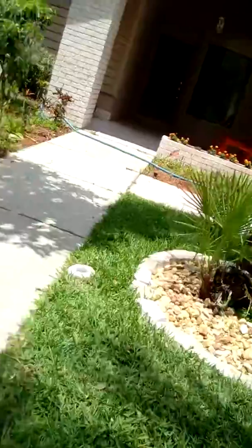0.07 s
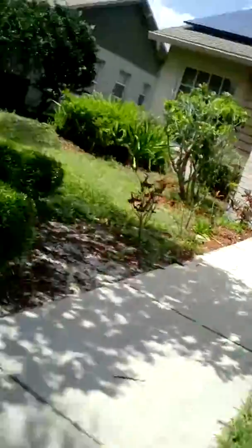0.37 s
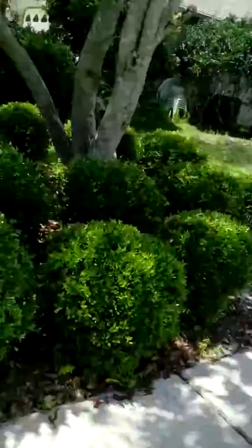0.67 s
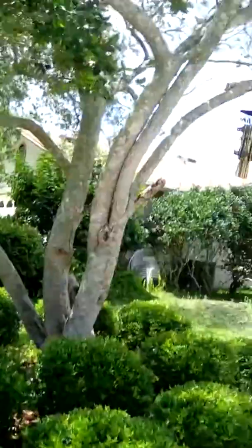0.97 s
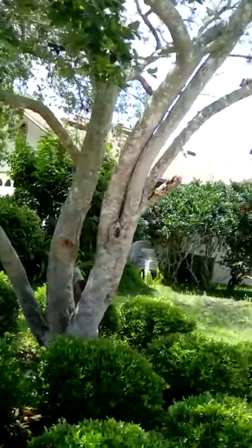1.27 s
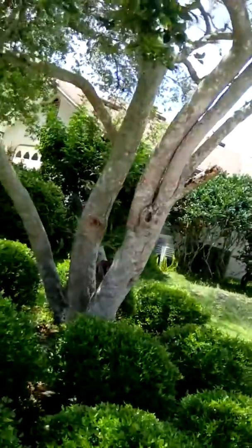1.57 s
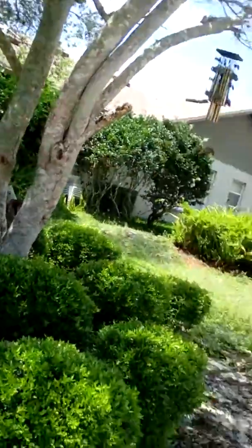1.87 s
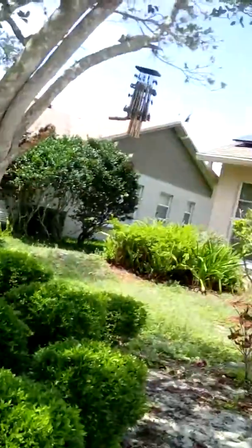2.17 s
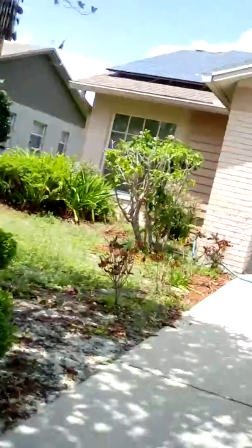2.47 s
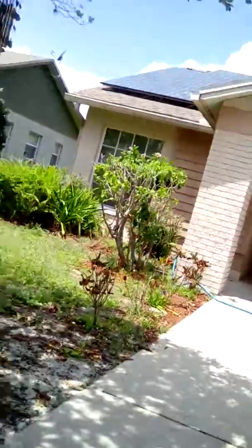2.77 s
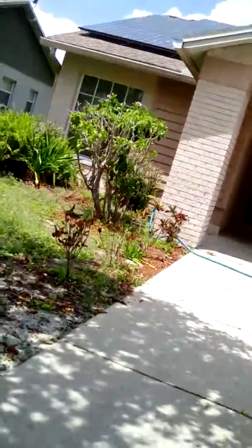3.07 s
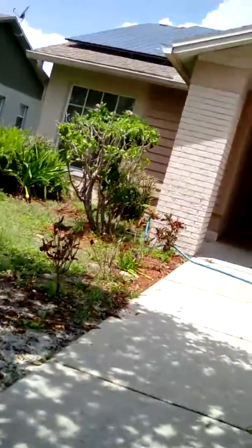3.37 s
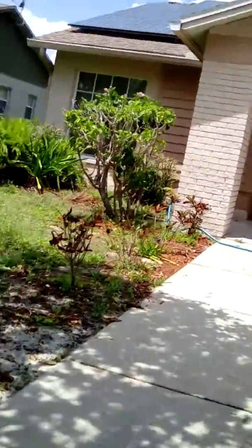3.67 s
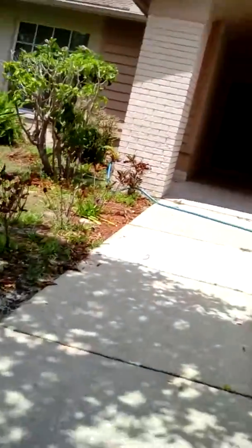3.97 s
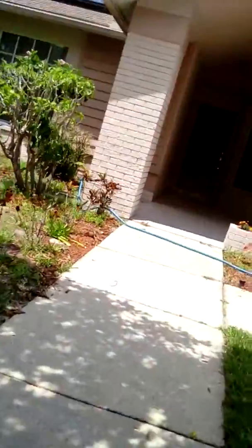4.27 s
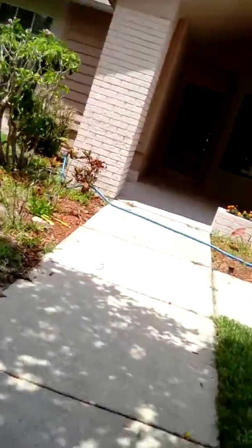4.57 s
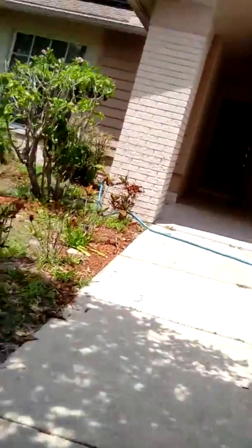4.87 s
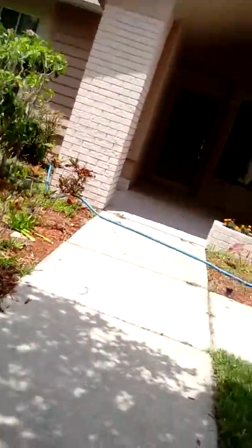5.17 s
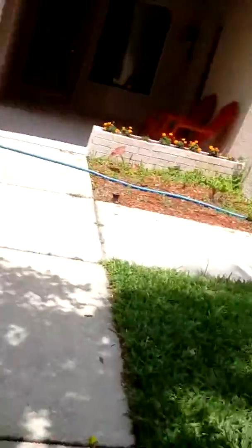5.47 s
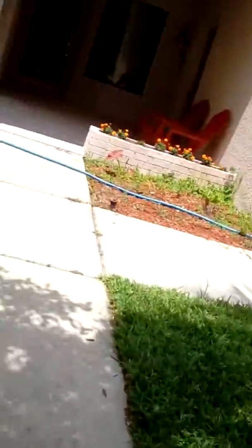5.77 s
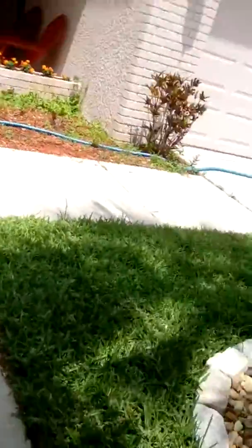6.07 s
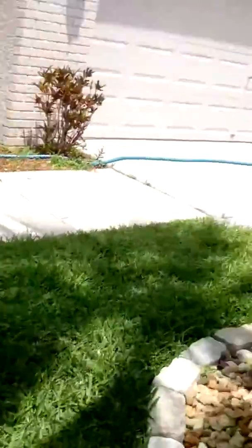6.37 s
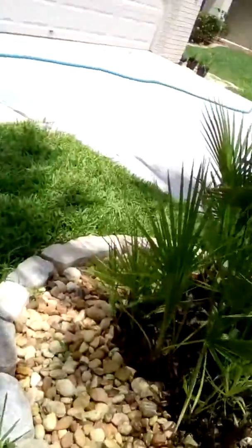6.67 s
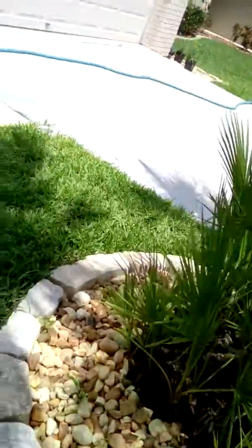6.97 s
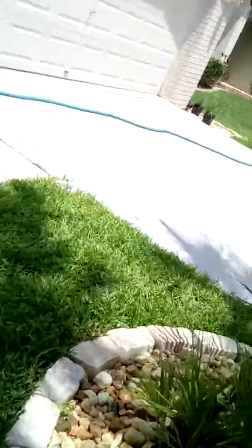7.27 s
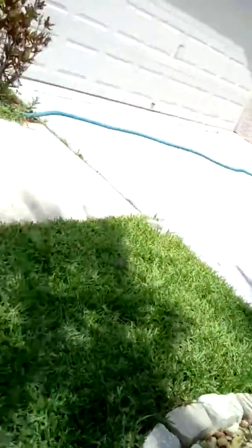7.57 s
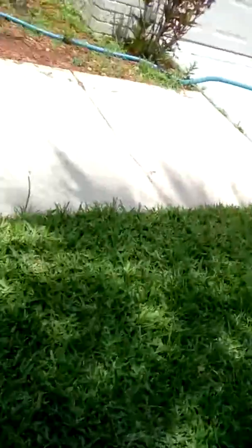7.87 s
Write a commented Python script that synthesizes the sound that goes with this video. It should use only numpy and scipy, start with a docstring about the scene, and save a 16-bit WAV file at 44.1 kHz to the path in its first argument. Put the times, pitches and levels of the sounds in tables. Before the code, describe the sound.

Keys jingle close by as someone strolls outdoors, with a few gritty footsteps on concrete and light puffs of wind.

```python
"""Loose metal pieces, keys perhaps, jingle close to the microphone as someone strolls a garden path.
They ring where they strike, tick where they only touch and rustle as they slide. On the concrete below,
a few shoe knocks and gritty scuffs stand out. Puffs of breeze and one dull bump buffet the microphone,
and far off a motor hums under the quiet outdoor air."""
import sys
import numpy as np
from scipy import signal
from scipy.fft import rfft, irfft
from scipy.io import wavfile
from scipy.ndimage import uniform_filter1d

SR = 44100
rng = np.random.default_rng(int(sys.argv[2]) if len(sys.argv) > 2 else 0)


def master(y):
    """Save y as 16-bit WAV."""
    cut = np.clip(np.atleast_2d(y).T, -1, 1)
    pcm = np.round(cut * 32767)  # scale
    wavfile.write(sys.argv[1], SR, pcm.astype(np.int16))


N = 357783
TIME = np.arange(N) / SR

# modes of the metal pieces, by register: (frequency [Hz], relative level [dB], t60 [s])
METAL_MODES = { "low": [(1491, -5, .25), (1500, 0, .3)], "middle": [(3960, -7, .2), (3983, 0, .28),
               (4001, -6, .22), (4232, -22, .1), (4414, -22, .08), (4630, -28, .1)],
               "bright": [(7040, -19, .06), (7370, -4, .06), (7420, 0, .08), (7478, -1, .09)],
               "shimmer": [(8120, -4, .035), (8215, -2, .04), (8300, 0, .05), (8430, -5, .07),
               (8620, -14, .02), (8765, -13, .06), (8938, -16, .08)], "sparkle": [(9370, -1, .04),
               (9490, 0, .07), (9630, -6, .1), (10520, -6, .03), (10730, -8, .06), (11400, -9, .025),
               (11700, -8, .05), (12120, -11, .02), (12465, -17, .06), (14000, -19, .03)]}
# how lively the bunch swings: (time [s], relative level [dB])
SWAY = [(0.0, -7), (0.15, -26), (0.45, 1.5), (0.92, -4), (1.3, -2), (1.8, -2.5), (2.2, 3), (3.1, 3),
        (3.25, -5.5), (3.55, 3.5), (4.3, 4.5), (5.3, 6.5), (5.6, 3), (6.15, 10.5), (6.4, 2), (6.75, 5.5),
        (7.4, -1), (8.11, -3.5)]
# hard blows in the bunch: (time [s], bright strength [dB], shimmer strength [dB])
CLINKS = [(0.395, -40, -47), (.5084, -43, -54), (0.6795, -38, -52), (1.073, -31, -56), (1.3423, -46, -43.5),
          (1.5, -39, -43.5), (1.948, -37, -55), (2.3036, -41, -42), (2.8876, -51, -50),
          (3.1157, -30.5, -54), (3.3883, -41, -44), (3.683, -32.5, -42), (3.7003, -28, -54),
          (3.943, -38, -49), (4.1533, -35, -50), (4.211, -32, -44), (4.3781, -36, -46),
          (4.5216, -38, -44.5), (4.9301, -32, -50), (5.0325, -28, -40), (5.0687, -27, -49),
          (5.228, -40, -51), (5.371, -35.5, -48), (5.5013, -42.5, -47), (5.7297, -37, -38.5),
          (5.802, -28, -47), (5.8515, -27, -34.5), (5.875, -48, -51), (6.014, -41, -43.5),
          (6.505, -20.5, -42), (6.531, -20, -49), (7.0449, -34, -56), (7.269, -42, -48),
          (7.4888, -31.5, -46), (7.7632, -42, -47)]
# colour of grit under a shoe: (frequency [Hz], gain [dB])
GRIT_COLOUR = [(200, -26.5), (2000, -23), (3000, -19), (4000, -16), (5200, -10), (6300, -4), (7200, -14),
               (8500, -24), (11000, -38), (16000, -51)]


def undb(db):
    """Decibels to gain."""
    return 10 ** (np.asarray(db) / 20)


def unit(x):
    """Scale to rms 1."""
    return x / np.sqrt(np.mean(x ** 2) + 1e-20)


def crest(x):
    """Scale to peak 1."""
    return x / np.max(np.abs(x))


def curves(table):
    """The columns of a table, joined by straight lines in time."""
    s, *columns = np.transpose(table)
    return [np.interp(TIME, s, c) for c in columns]


def add(out, s, x):
    """Mix a short sound in at time s."""
    i = max(int(s * SR), 0)
    out[i:i + len(x)] += x[:max(N - i, 0)]


def colour(x, points, size=4096):
    """Minimum-phase filter through (frequency [Hz], gain [dB]) points."""
    hz, db = np.transpose(points)
    log_hz = np.log(np.fft.rfftfreq(size, 1 / SR) + 1)
    gain = undb(np.interp(log_hz, np.log(hz), db))
    cepstrum = irfft(np.log(gain))
    cepstrum[1:size // 2] *= 2
    cepstrum[size // 2 + 1:] = 0
    response = irfft(np.exp(rfft(cepstrum)))
    return signal.fftconvolve(x, response)[:len(x)]


def lowpass(x, hz):
    """Roll off the treble above hz."""
    return signal.sosfilt(signal.butter(4, hz, fs=SR, output="sos"), x)


def ring(x, hz, t60):
    """One decaying mode, driven by x."""
    pole = np.exp((2j * np.pi * hz - np.log(1000) / t60) / SR)
    return signal.lfilter([0, pole.imag], [1, -2 * pole.real, abs(pole) ** 2], x + 1e-18)


def struck(x, hz, t60, contact_s):
    """A mode fed through a contact that takes a moment, so it builds up without a click."""
    return ring(ring(x, hz, contact_s), hz, t60) * np.sin(2 * np.pi * hz / SR)


def wander(per_s):
    """Random drift, spread near 1."""
    knots = rng.standard_normal(4096)
    return np.interp(TIME * per_s, np.arange(len(knots)), knots)


def contacts(size, per_s, spread_db):
    """Tiny impacts at random times, of uneven strength."""
    spread = np.minimum(rng.exponential(size=size), 4)
    return (rng.random(size) < per_s / SR) * undb(spread_db * spread)


def swell(x, db, window_s):
    """Bring the short-term level of x onto a curve."""
    size = int(window_s * SR)
    power = uniform_filter1d(uniform_filter1d(x ** 2, size), size)
    return x * undb(db) / np.sqrt(np.abs(power) + 1e-12)


def together(*levels_db):
    """Level in dB of unrelated sounds heard at once."""
    return 10 * np.log10(sum(undb(db) ** 2 for db in levels_db))


def bursts(table, attack_s, release_s):
    """Level in dB of (time [s], hold [s], level [dB]) events that rise, hold and die away."""
    power = np.zeros(N) + 1e-14
    t = np.arange(SR) / SR
    for s, hold_s, db in table:
        rise = np.minimum(t / attack_s, 1)
        fall = np.exp(-np.maximum(t - attack_s - hold_s, 0) / release_s)
        add(power, s, (undb(db) * rise * fall) ** 2)
    return 10 * np.log10(power)


def touched_metal(register, db, window_s, contact_s):
    """The pieces keep touching; each touch feeds every mode of a register by a chance amount."""
    touches = contacts(N, per_s=260, spread_db=2.5)
    where, out = np.flatnonzero(touches), np.zeros(N)
    for hz, mode_db, t60 in METAL_MODES[register]:
        push = np.zeros(N)
        push[where] = touches[where] * rng.standard_normal(len(where))
        out += undb(mode_db) * unit(struck(push, hz, t60, contact_s))
    return swell(out, db, window_s)


def large_pieces(sway_db, flutter_db=0.5):
    """Two long rings that murmur with the swing and swell when their piece is knocked."""
    # knocks on the largest and the middle piece: (time [s], hold [s], level [dB])
    low_knocks = [(0, 0.066, -64.5), (.269, 0.3, -66.5), (1.234, 0.19, -60.5), (1.506, .024, -58),
                  (1.934, 0.047, -55.5), (2.14, .2, -63), (2.734, 0.039, -58), (2.85, 0.077, -61),
                  (3.46, 0.036, -58.5), (3.66, 0.23, -63), (4.357, .006, -55.5), (4.51, 0.018, -58.5),
                  (4.74, 0.18, -61.5), (4.92, .06, -57.5), (5.32, 0.017, -64), (5.722, 0.13, -58),
                  (5.965, 0.11, -56.5), (6.29, 0.054, -57), (6.464, 0.089, -58.5), (6.64, 0.11, -62),
                  (7.04, 0.051, -58.5), (7.26, 0.026, -62), (7.58, 0.032, -65), (7.905, 0.12, -64)]
    middle_knocks = [(.5, 0.055, -57.5), (.66, 0.053, -47), (.775, .08, -56.5), (.975, 0.018, -59),
                     (1.217, .005, -48), (1.325, 0.022, -50), (1.44, .02, -57), (1.557, 0.035, -49),
                     (1.919, 0.12, -51.5), (2.175, 0.0043, -44), (2.25, 0.084, -51.5), (2.45, .03, -52),
                     (2.63, 0.12, -50), (2.785, 0.018, -42), (2.886, 0.15, -47.5), (3.39, 0.28, -56.5),
                     (3.695, .02, -42.5), (3.78, 0.039, -48.5), (3.94, 0.26, -55.5), (4.355, 0.0085, -37.5),
                     (4.53, 0.011, -45), (4.72, .14, -50), (5.013, 0.031, -40), (5.149, 0.15, -47),
                     (5.453, 0.06, -45.5), (5.71, 0.01, -42.5), (5.81, 0.22, -45), (6.006, 0.17, -42),
                     (6.274, 0.082, -48), (6.45, 0.11, -52), (6.7, 0.11, -50.5), (6.949, .005, -45),
                     (7.02, 0.013, -49.5), (7.243, 0.1, -49), (7.645, 0.0052, -48.5), (7.755, 0.024, -40.5),
                     (7.93, 0.22, -58.5)]
    low_murmur_db = -68 + 0.096 * sway_db + flutter_db * wander(9)
    middle_murmur_db = -57 + 0.64 * sway_db + flutter_db * wander(9.5)
    low_db = together(low_murmur_db, bursts(low_knocks, attack_s=0.04, release_s=0.051))
    middle_db = together(middle_murmur_db, bursts(middle_knocks, attack_s=0.016, release_s=0.038))
    low = touched_metal("low", low_db, window_s=0.07, contact_s=0.012)
    middle = touched_metal("middle", middle_db, window_s=0.06, contact_s=0.016)
    return low, middle


def rustle(sway_db):
    """The dry sound of pieces sliding on each other, in short catches."""
    # stronger slides: (time [s], hold [s], level [dB])
    slides = [(.19, 0.014, -58), (.45, 0.023, -55), (.57, 0.091, -61), (1.06, .15, -57.5), (1.33, .02, -52),
              (2.18, 0.15, -55.5), (2.89, .03, -49), (4.34, 0.13, -50), (4.5, .03, -54.5),
              (4.69, 0.11, -53.5), (5.025, 0.042, -52.5), (4.93, .025, -52), (5.78, 0.085, -53),
              (5.995, 0.16, -51.5), (6.28, 0.013, -58), (6.51, 0.071, -58), (7.755, 0.016, -54)]
    # colour of sliding metal: (frequency [Hz], gain [dB])
    slide_colour = [(300, -49.5), (1500, -23.5), (2300, -16.5), (3100, -15.5), (4200, -4), (4900, -15),
                    (5700, -5.5), (6450, -1), (7200, -4.5), (7900, -7), (10000, -28.5), (12000, -53),
                    (15500, -51)]
    db = together(-59 + 0.23 * sway_db, bursts(slides, attack_s=0.0086, release_s=0.06))
    friction = contacts(N, per_s=3000, spread_db=3.0) * rng.standard_normal(N)
    catching = unit(friction * undb(5.0 * wander(45)))
    return swell(colour(catching, slide_colour), db, window_s=0.11)


def small_pieces(sway_db, flutter_db=4.0, quiet_db=-55):
    """Quick bright rings; their higher modes and a fine sheen grow with them and flare in a rattle."""
    # the small pieces jostle together: (time [s], hold [s], strength [dB])
    jostles = [(0.19, 0.0086, -53), (1.033, 0.14, -51.5), (1.188, 0.023, -45), (1.432, 0.18, -49.5),
               (1.936, 0.026, -43.5), (2.64, 0.155, -50), (2.885, 0.14, -45.5), (3.101, 0.019, -47),
               (3.679, 0.052, -43.5), (4.01, 0.15, -47), (4.355, 0.061, -43), (4.56, 0.014, -42),
               (5.012, 0.037, -35.5), (5.225, 0.027, -46.5), (5.793, 0.097, -38.5), (5.999, 0.012, -36.5),
               (6.494, 0.034, -35.5), (6.642, 0.009, -45), (7.477, 0.11, -50), (7.748, 0.063, -49)]
    # two pieces buzz hard against each other: (time [s], hold [s], shimmer [dB], sparkle [dB])
    rattles = [(0.655, 0.032, -54, -64), (4.337, 0.12, -54, -66), (4.567, 0.03, -43.5, -59),
               (4.666, .17, -58, -71), (5.021, 0.026, -52.5, -49.5), (5.21, .11, -62.5, -64),
               (5.394, 0.309, -72, -66.5), (5.847, 0.0091, -27, -46), (5.866, 0.012, -44, -34.5),
               (5.974, 0.21, -65, -55.5), (6.508, 0.032, -53, -45)]
    # fine hiss of polished metal rubbing: (frequency [Hz], gain [dB])
    sheen_colour = [(4000, -47), (8500, 5), (9500, 4.5), (10000, -3), (10600, 10), (11100, -22),
                    (11700, 17.5), (12300, -33), (12900, -22), (14000, -3), (15500, -8)]
    murmur_db = -57 + sway_db + flutter_db * wander(33)
    bright_db = together(murmur_db, bursts(jostles, attack_s=0.0051, release_s=0.021) - 2)
    rattle_shimmer_db, rattle_sparkle_db = (
        bursts(np.array(rattles)[:, [0, 1, k]], attack_s=0.003, release_s=0.007) for k in (2, 3))
    shimmer_db = together(-61 + 0.94 * (bright_db - quiet_db), rattle_shimmer_db)
    sparkle_db = together(-74 + 0.93 * (bright_db - quiet_db), rattle_sparkle_db)
    bright = touched_metal("bright", bright_db, window_s=0.034, contact_s=0.029)
    shimmer = touched_metal("shimmer", shimmer_db, window_s=0.021, contact_s=0.013)
    sparkle = touched_metal("sparkle", sparkle_db, window_s=0.059, contact_s=0.017)
    sheen = undb(sparkle_db - 10) * unit(colour(rng.standard_normal(N), sheen_colour))
    return bright + shimmer + sparkle + sheen


def free_swing(gap_s=0.023, dip_db=-7, recover_s=0.0023):
    """Gain of the small touches: the pieces swing apart just before they clink."""
    apart = np.zeros(N)
    for s, *_ in CLINKS:
        gap = np.interp(TIME - s, [-gap_s, -gap_s / 2, 0, recover_s], [0, 1, 1, 0])
        apart = np.maximum(apart, gap)
    return undb(dip_db * apart)


def jingle():
    """One swing moves the whole bunch, close to the microphone."""
    sway_db, = curves(SWAY)
    low, middle = large_pieces(sway_db)
    # the quick rings die away during a free swing; the slower sounds only sag
    touch = free_swing()
    return low + (middle + rustle(sway_db)) * np.sqrt(touch) + small_pieces(sway_db) * touch


def outdoor_air(edges_hz=(15, 300, 700, 1500, 3000, 15000)):
    """Quiet garden air, its low and high hiss drifting apart."""
    # course of the hiss before the drift: (time [s], level [dB])
    air_level = [(0, -54.5), (1.3, -56.5), (2.2, -58), (5, -59.5), (8.11, -56.5)]
    # colour of the air: (frequency [Hz], gain [dB])
    air_colour = [(20, -26), (50, -9.5), (100, -4.5), (160, 1), (250, -7.5), (400, -16.5), (700, -15),
                  (1100, -15.5), (2000, -23.5), (3200, -25), (6400, -10), (8000, -24.5), (10000, -39),
                  (15500, -52)]
    air = undb(curves(air_level)[0]) * unit(colour(rng.standard_normal(N), air_colour))
    out = np.zeros(N)
    for band_hz in zip(edges_hz, edges_hz[1:]):
        band = signal.sosfiltfilt(signal.butter(3, band_hz, "bandpass", fs=SR, output="sos"), air)
        out += band * undb(0.97 * wander(3.03) + 2.0 * wander(18))
    return out


def distant_motor(drone_hz=141.2, waver_db=2.4):
    """Two shaft harmonics and a lower drone from far off, wavering on the way to the microphone."""
    # hum: (time [s], shaft rate [Hz], third harmonic [dB], fourth harmonic [dB], drone [dB])
    hum = [(0, 60.46, -56, -62.5, -60), (1, 59.65, -58.5, -63.5, -88), (2.5, 59.03, -61.5, -71, -72.5),
           (3.5, 59.77, -61, -67, -66.5), (4.8, 58.6, -73, -64.5, -61), (5.4, 57.93, -66.5, -61, -55),
           (6.2, 60.35, -57.5, -68, -63), (7.2, 58.34, -63, -61, -69.5), (8.1, 59.5, -73, -63.5, -48.5)]
    shaft_hz, third_db, fourth_db, drone_db = curves(hum)
    out = np.zeros(N)
    for hz, db in ((3 * shaft_hz, third_db), (4 * shaft_hz, fourth_db), (drone_hz, drone_db)):
        phase = 2 * np.pi * np.cumsum(hz * (1 + 0.00795 * wander(9))) / SR
        out += undb(db + waver_db * wander(7)) * np.sin(phase)
    return out


def steps(lag_cycles=0.97, snap_s=0.00025, snap_top_hz=7500, size=4096):
    """Grit snaps on the path below, then the soft sole knocks; its lows arrive last as it flattens."""
    # shoe on concrete: (time [s], knock level [dB], pitch [Hz], grit peak [dB])
    footfalls = [(0.041, -38, 540, -37), (.296, -36, 700, -45), (.352, -27, 1010, -16.5),
                 (.356, -34, 430, -40), (0.63, -39.5, 460, -44), (1.128, -37, 770, -50),
                 (1.141, -37.5, 460, -55), (1.841, -44.5, 505, -36.5), (3.756, -36.5, 419, -55),
                 (3.927, -51, 572, -61.5), (6.5455, -28.5, 915, -41), (6.5468, -30.5, 443, -54),
                 (7.091, -45, 500, -57)]
    # sole resonances: (multiple of the pitch, relative level [dB], 60 dB fade [cycles])
    sole_modes = [(1, -1, 3.5), (2.1, -3.5, 10), (3.9, -7.5, 11)]
    out, t = np.zeros(N), np.arange(size) / SR
    for s, knock_db, hz, grit_db in footfalls:
        for multiple, db, ring_cycles in sole_modes:
            cycles = hz * multiple * t
            rise = 1 - np.exp(-(2 * cycles) ** 2)
            fade = np.exp(-np.log(1000) * cycles / ring_cycles)
            mode = np.sin(2 * np.pi * cycles) * fade * rise
            add(out, s + lag_cycles / (hz * multiple), undb(knock_db + db) * crest(mode))
        snap = colour(rng.standard_normal(size) * np.exp(-t / snap_s), GRIT_COLOUR)
        add(out, s, undb(grit_db) * crest(lowpass(snap, snap_top_hz)))  # muffled by the sole
    return out


def ticks(decay_s=0.0018, faint_per_s=9, faint_db=-43, scatter_db=3, size=2048):
    """Pieces touch without ringing; faint ticks fall by chance, most often in a lively swing."""
    # ticks that stand out of the rustle: (time [s], peak [dB])
    clear_ticks = [(1.344, -40), (2.1722, -37), (2.888, -34.5), (3.6817, -38), (4.209, -44), (4.3572, -32),
                   (4.5188, -33), (4.7027, -34), (4.9369, -36), (5.1549, -39), (5.73, -30.5), (5.801, -29),
                   (5.8717, -30.5), (6.0045, -32), (6.1327, -38.5), (6.2993, -34), (6.5344, -46),
                   (6.952, -35.5), (7.7638, -37)]
    # colour of a dry tick: (frequency [Hz], gain [dB])
    tick_colour = [(500, -44), (2000, -8), (3200, -3.5), (4500, 5), (5600, 9), (6400, 20.5), (7200, 13.5),
                   (8500, -29), (11000, -21), (15500, -21)]
    out, t = np.zeros(N), np.arange(size) / SR
    liveliness = undb(curves(SWAY)[0])
    onsets = np.flatnonzero(rng.random(N) < faint_per_s * liveliness / SR)
    chance_db = faint_db + scatter_db * rng.uniform(-1, 1, N)
    faint_ticks = [(i / SR, chance_db[i]) for i in onsets]
    for s, db in list(clear_ticks) + faint_ticks:
        snap = rng.standard_normal(size) * np.exp(-t / decay_s)
        add(out, s, undb(db) * crest(colour(snap, tick_colour)))
    return out


def breeze(calm_db=-62.5):
    """Eddies tumble over the microphone port, in puffs."""
    # puffs on the microphone: (time [s], hold [s], level [dB])
    puffs = [(.29, 0.022, -45.5), (.975, 0.08, -49), (1.2, 0.307, -55), (1.737, 0.03, -39.5),
             (1.81, 0.0094, -37.5), (1.95, 0.31, -51), (2.15, 0.012, -49), (4.538, 0.0048, -40.5),
             (6.33, 0.261, -46.5), (6.651, 0.19, -42.5), (6.83, 0.21, -49), (7.175, 0.066, -49.5)]
    # colour of the buffeting: (frequency [Hz], gain [dB])
    buffet_colour = [(20, -28), (40, -5.5), (70, 1.5), (120, 1), (180, -7.5), (300, -17), (600, -35.5),
                     (1500, -61), (5000, -69)]
    db = together(calm_db, bursts(puffs, attack_s=0.024, release_s=0.044))
    return swell(colour(rng.standard_normal(N), buffet_colour), db, window_s=0.08)


def scuffs():
    """The sole drags over sand grains on the concrete: a dull rub with a gritty top."""
    # drags of the sole: (time [s], length [s], rub level [dB], grit level [dB])
    drags = [(0.307, 0.076, -46.5, -45.5), (0.383, 0.15, -54.5, -54.5), (0.443, 0.055, -53.5, -62),
             (0.929, 0.07, -55.5, -66), (1.106, 0.11, -56, -52), (5.97, 0.15, -67, -51),
             (6.407, 0.069, -58, -73), (6.529, 0.042, -52, -50), (8.074, 0.042, -53, -43)]
    # colour of the rub: (frequency [Hz], gain [dB])
    rub_colour = [(60, -21), (150, 11.5), (600, 10.5), (1200, 4.5), (2000, 5.5), (3200, 5.5), (5000, -26),
                  (9000, -35), (16000, -84)]
    rub, grit = (unit(colour(contacts(N, per_s=6700, spread_db=-1) * rng.standard_normal(N), points))
                 for points in (rub_colour, GRIT_COLOUR))
    out = np.zeros(N)
    for s, length, rub_db, grit_db in drags:
        progress = np.clip((TIME - s) / length, 0, 1)
        pressure = 4 * progress * (1 - progress)
        out += pressure * (undb(rub_db) * rub + undb(grit_db) * grit)
    return out


def clinks(chatter_s=0.045, hard_db=-27, clash_top_hz=12500, size=11025):
    """Metal strikes metal: a clean blow, then chatter, longer and brighter the harder it was."""
    # colour of the hard metal-on-metal click: (frequency [Hz], gain [dB])
    clash_colour = [(1000, -50), (4000, -22), (5600, -6), (6500, 6), (7600, -46), (9000, 8), (11500, -23),
                    (15500, -17)]
    out, t = np.zeros(N), np.arange(size) / SR
    blow = signal.unit_impulse(size)
    for s, bright_db, shimmer_db in CLINKS:
        force = np.sqrt(undb(shimmer_db - hard_db))
        chatter = contacts(size, per_s=1400, spread_db=-0.5) * (t < chatter_s * force) * 1.36 * force
        peaks_db = dict(bright=bright_db - 5, shimmer=shimmer_db + 0.5,
                        sparkle=shimmer_db - 18.5 + 6 * force)
        for register, db in peaks_db.items():
            ringing = np.zeros(size)
            for hz, mode_db, t60 in METAL_MODES[register]:
                push = blow + chatter * rng.standard_normal(size)
                ringing += undb(mode_db) * struck(push, hz, t60, contact_s=0.0009)
            add(out, s, undb(db) * crest(ringing))
        clash = colour(blow + chatter * rng.standard_normal(size), clash_colour)
        clash = lowpass(clash, clash_top_hz)  # small pieces meet too softly to click higher
        add(out, s, undb(shimmer_db - 8) * crest(clash))
    return out


def pings(t60=0.58, size=22050):
    """A shorter piece, struck alone, rings out freely on one clear note."""
    # strikes: (time [s], pitch [Hz], peak [dB])
    strikes = [(1.344, 4410, -61), (2.541, 4340, -57), (2.918, 4700, -56), (2.929, 4250, -51),
               (3.323, 4620, -60), (3.39, 4380, -60), (4.53, 4450, -53), (4.931, 4330, -57),
               (5.27, 4430, -57), (5.8, 4350, -50), (6.71, 4660, -50), (8.0, 4420, -55.5)]
    out = np.zeros(N)
    for s, hz, db in strikes:
        note = struck(signal.unit_impulse(size), hz, t60, contact_s=0.019)
        add(out, s, undb(db) * crest(note))
    return out


def bump(hz=115, t60=0.15):
    """The case of the recorder thuds briefly, right at the microphone."""
    # dull bump on the case: (time [s], hold [s], level [dB])
    thuds = [(4.542, 0.014, -32.5)]
    db = bursts(thuds, attack_s=0.017, release_s=0.017)
    return swell(ring(rng.standard_normal(N), hz, t60), db, window_s=0.055)


def scene():
    """One microphone on the garden path: metal up close, shoes below, the motor far off."""
    metal = jingle() + clinks() + ticks() + pings()
    return (metal + steps() + scuffs() + breeze() + bump() + outdoor_air() + distant_motor())[None]


def record(dry, top_hz=15800):
    """The recorder cuts the top treble steeply."""
    return signal.sosfilt(signal.ellip(10, 0.2, 80, top_hz, fs=SR, output="sos"), dry)


dry = scene()
out = record(dry)
master(out)
```